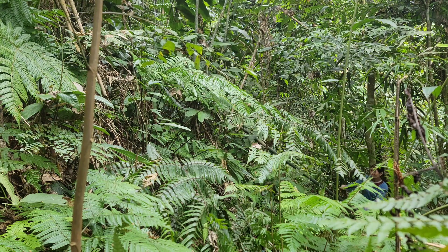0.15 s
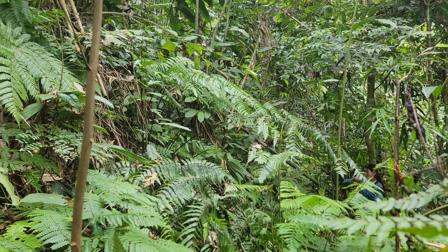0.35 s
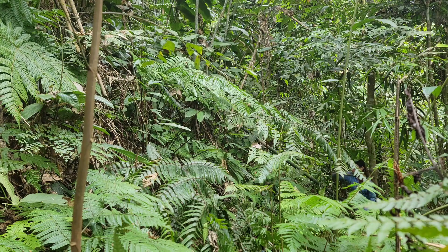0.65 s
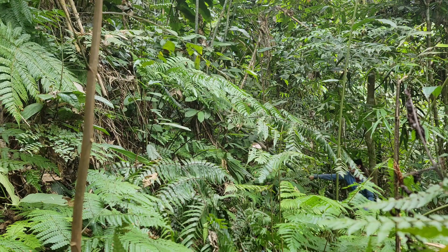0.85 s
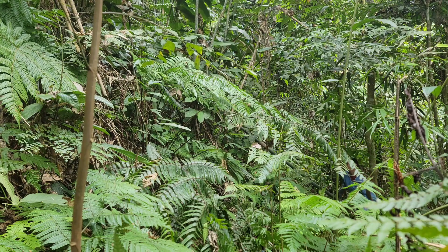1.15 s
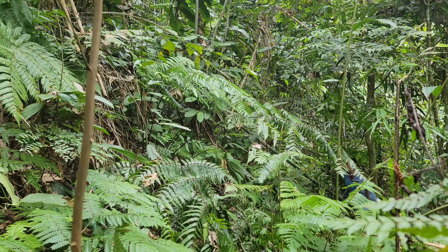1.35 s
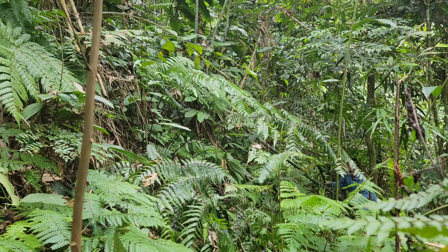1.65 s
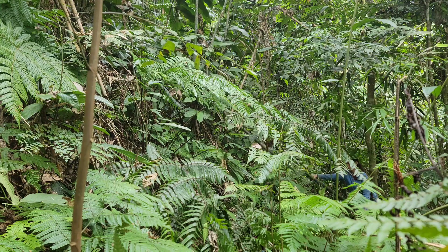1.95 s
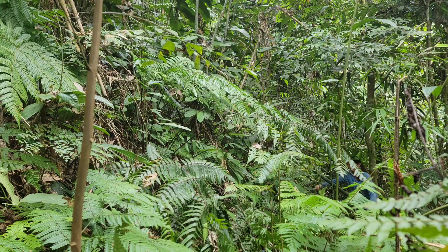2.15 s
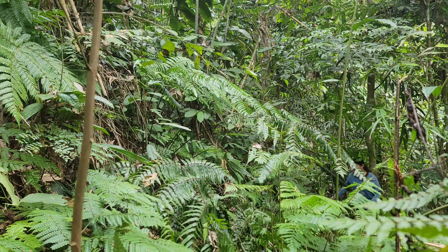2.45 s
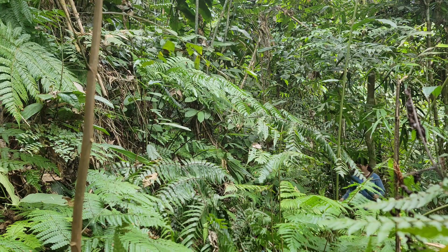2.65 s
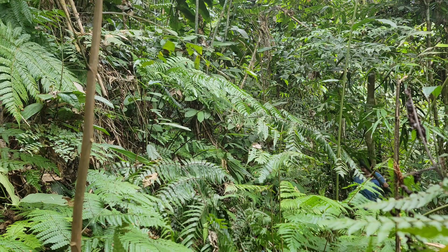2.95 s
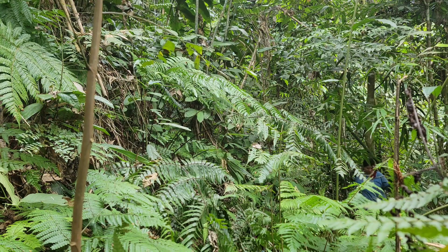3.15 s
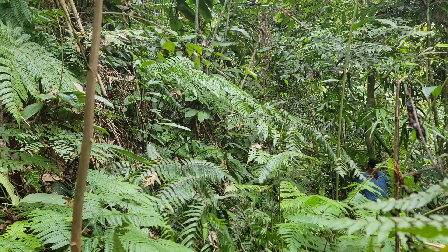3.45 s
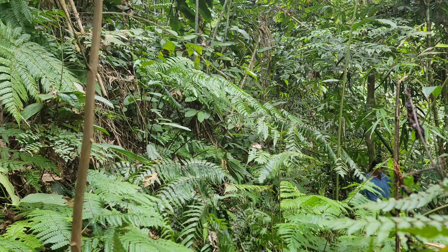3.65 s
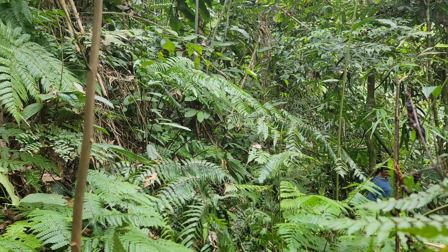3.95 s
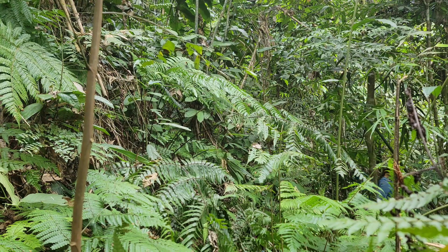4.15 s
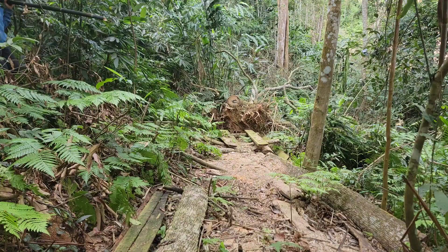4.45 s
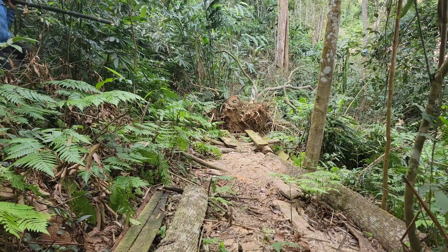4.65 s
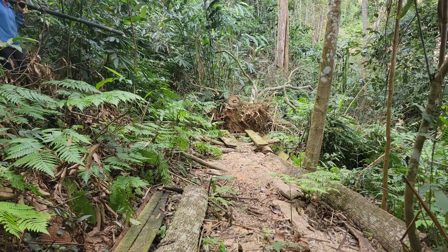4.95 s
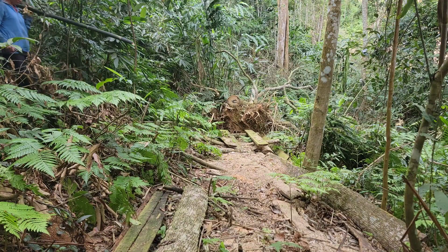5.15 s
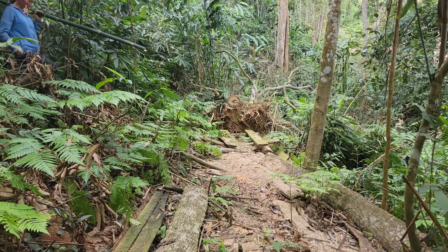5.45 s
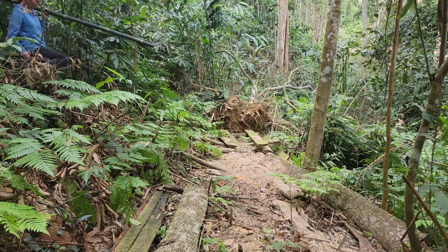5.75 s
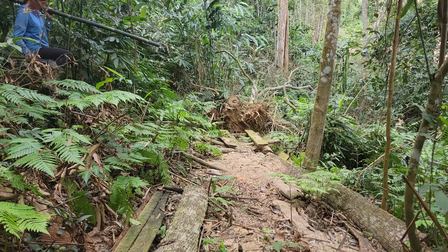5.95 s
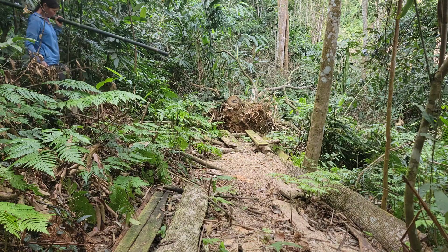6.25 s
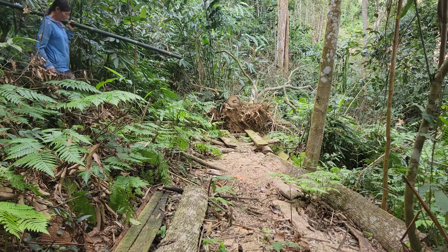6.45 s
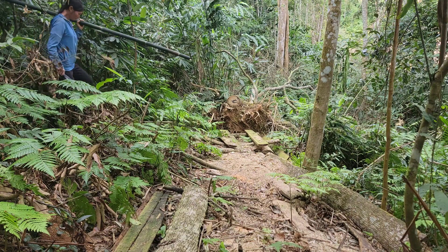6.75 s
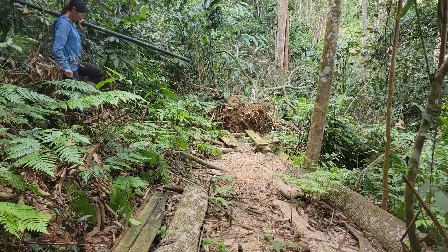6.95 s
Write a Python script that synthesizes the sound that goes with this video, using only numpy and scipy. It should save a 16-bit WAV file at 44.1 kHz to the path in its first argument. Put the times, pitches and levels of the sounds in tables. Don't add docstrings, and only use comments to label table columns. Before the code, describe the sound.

Quiet outdoor stereo with faint forest air. A hidden walker on the right rustles fern fronds, cracks twigs and gives a long hollow pole two loud knocks, the first with a quick rebound, while distant dull wood knocks echo. A tiny gap of silence marks a change of place; then, left of a path, dry leaves crunch in uneven surges and brittle stalks snap, drier and crisper than before.

```python
import sys
import numpy as np
from scipy import signal
from scipy.fft import rfft, irfft
from scipy.io import wavfile
from scipy.ndimage import uniform_filter1d, map_coordinates

SR = 44100
rng = np.random.default_rng(int(sys.argv[2]) if len(sys.argv) > 2 else 0)


def magnitude_from_level(level_db):
    exponent = np.asarray(level_db, float) / 20
    return 10 ** exponent


def to_wav(s):
    ch = np.atleast_2d(s).T
    pcm = np.round(np.clip(ch, -1, 1) * 32767)
    wavfile.write(sys.argv[1], SR, pcm.astype(np.int16))


N = 313110
TIME = np.arange(N) / SR

# (time [s], level [dB])
SCENE_CHANGE = [(0, -1), (4.335, -1), (4.365, -15), (4.38, -41), (4.385, -89.5), (4.445, -77), (4.452, -33),
                (4.465, -5), (4.49, 1)]
PATH_START_S = SCENE_CHANGE[4][0]


def evened(x):
    return x / np.sqrt(np.mean(x ** 2) + 1e-20)


def read(points, hz):
    f, value = np.transpose(points)
    return np.interp(np.log(hz + 1), np.log(f + 1), value)


def add(mix, s, sound):
    part = mix[round(s * SR):][:len(sound)]
    part += sound[:len(part)]


def shape(x, gain):
    return irfft(rfft(x) * gain(np.fft.rfftfreq(x.shape[-1], 1 / SR)), x.shape[-1])


def band(hz, lo_hz, hi_hz):
    return 1 / np.sqrt((1 + (lo_hz / (hz + 1)) ** 6) * (1 + (hz / hi_hz) ** 6))


def ring(modes, length_s, tilt_db=0):
    t = np.arange(round(length_s * SR)) / SR
    out = np.zeros(len(t))
    for hz, db, t60 in modes:
        level_db = db + tilt_db * np.log2(hz / 400) - 60 * t / t60
        out += magnitude_from_level(level_db) * np.sin(2 * np.pi * hz * t)
    return out


def diffuse(pair, alike_hz=750):
    def alike(hz):
        return 1 / (1 + (hz / alike_hz) ** 2)

    def unrelated(hz):
        return np.sqrt(1 - alike(hz) ** 2)

    return np.array([pair[0], shape(pair[0], alike) + shape(pair[1], unrelated)])


def echoes(t60s, start_s):
    hz, t, z = signal.stft(diffuse(rng.standard_normal((2, SR))), SR, nperseg=256)
    decay = magnitude_from_level(-60 * t / read(t60s, hz)[:, None])
    out = signal.istft(z * decay, SR, nperseg=256)[1][:, :SR]
    out = out * np.clip(TIME[:SR] / start_s, 0, 1)
    return out / np.linalg.norm(out[0])


def tail(x, t60s, start_s=0.0027):
    return signal.fftconvolve(x[None], echoes(t60s, start_s), axes=1)[:, :N]


def placed(direct, scattered, sideways=1):
    # (time [s], lag of the left microphone [ms], left minus right [dB])
    place = [
        (0, 0.22, -4),
        (3.3, 0.23, -4.5),
        (4.399, 0.25, -7.5),
        (4.41, -0.25, -1.5),
        (7.1, -0.18, -.7),
    ]
    sway, waver_hz = 0.073, 1.6
    s, lag_ms, pan_db = np.transpose(place)
    swing = 1 + sway * np.sin(2 * np.pi * waver_hz * TIME)
    lag_s = sideways * np.interp(TIME, s, lag_ms) * swing / 1000
    pan = magnitude_from_level(sideways * np.interp(TIME, s, pan_db) * np.array([[.5], [-.5]]))
    left, right = direct + scattered
    return pan * np.array([map_coordinates(left, [np.arange(N) - lag_s * SR], order=3), right])


def hush():
    # (frequency [Hz], level [dB per Hz])
    air_colour = [(12, -40), (20, -17), (43, -0.5), (222, -9), (399, 0), (1030, -5.5), (1260, -5),
                  (1860, -12.5), (2910, -8.5), (8650, -4), (11100, -11.5), (14700, -4.5), (16000, -28.5)]
    level_db = -69.5
    air = shape(diffuse(rng.standard_normal((2, N))), lambda hz: magnitude_from_level(read(air_colour, hz)))
    drift = evened(uniform_filter1d(uniform_filter1d(rng.standard_normal(N), 4000), 4000))
    return magnitude_from_level(level_db + 0.31 * drift + np.array([[-.7], [.7]])) * evened(air)


def far_knocks():
    # (time [s], peak [dB])
    knocks = [(0.226, -54.5), (1.367, -49.5), (1.516, -59.5), (2.294, -51), (2.891, -58.5), (3.162, -47.5),
              (4.077, -53)]
    # (frequency [Hz], level [dB], decay t60 [s])
    wood = [(198.7, -5.5, 0.09), (420, 1, .12), (473.6, 1.5, 0.09), (842, 5, 0.04), (1140, -4.5, 0.035)]
    # (frequency [Hz], decay t60 [s])
    valley = [(150, 0.19), (430, 1.4), (1000, 0.79)]
    late_cycles = 3.15
    length_s = .3
    soft_start = np.clip(TIME[:round(length_s * SR)] / 0.0037, 0, 1)
    out = np.zeros(N)
    for s, db in knocks:
        for mode in wood:
            arrival_s = s - .009 + late_cycles / mode[0]
            add(out, arrival_s, magnitude_from_level(db - 1.5) * ring([mode], length_s) * soft_start)
    return out * magnitude_from_level([[-1.5], [1.5]]) + magnitude_from_level(-3.0) * tail(out, valley, start_s=0.014)


def pole():
    # (time [s], crack [dB], crack t60 [s], air column [dB], brightness [dB per octave])
    blows = [
        (0.8425, -27, 0.18, -26, -1),
        (0.8554, -29, 0.16, -30.5, 4.5),
        (0.869, -41.5, 0.046, -43.5, -5.5),
        (1.9961, -25.5, 0.14, -26, 1.5),
    ]
    # (frequency
    # [Hz], level [dB], decay t60 [s])
    column_modes = [(98, -9, 0.11), (127, -8.5, 0.82), (381.7, -7.5, 0.31), (642, 3, 0.08), (901, 4, 0.07),
                    (1086, -10, 0.09), (1154, -10, 0.14), (1475, -5, 0.05), (1610, -15.5, 0.02),
                    (2144, -11, 0.049)]
    # (frequency [Hz], level [dB per Hz])
    crack_colour = [(120, -42.5), (200, -30.5), (482, -14.5), (612, -12), (899, -9.5), (1320, -5.5),
                    (7680, -12), (14900, -22.5), (16000, -39.5)]
    # (frequency [Hz], decay t60 [s])
    forest = [(100, 0.66), (400, 0.93), (1200, 0.44), (3000, 0.62), (8000, 0.49), (15000, 0.73)]
    crack, column, t = np.zeros((3, N)), np.zeros(N), TIME[:SR]
    stilled = np.interp(t, [0, .004, .4, .56], [0, 1, 1, 0])
    for s, crack_db, t60, column_db, tilt_db in blows:
        near = rng.standard_normal((3, SR)) * magnitude_from_level(-60 * t / t60 + np.array([[-3.], [0], [0]]))
        direct = near[0] * (1 + 0.5 * magnitude_from_level(-60 * t / 0.0067))
        scattered = diffuse(near[1:]) + magnitude_from_level(22.0) * echoes(forest, 0.0018)
        burst = np.array([direct, *scattered]) * np.clip(t / 0.00037, 0, 1)
        burst = shape(burst, lambda hz: magnitude_from_level(read(crack_colour, hz) + 18.0)) * (t < .95)
        for channel, part in zip(crack, burst):
            add(channel, s, magnitude_from_level(crack_db) * part)
        add(column, s, magnitude_from_level(column_db) * ring(column_modes, 1., tilt_db) * stilled)
    column_tail = magnitude_from_level(-5.0) * tail(column, [(hz, 0.29 * t60) for hz, t60 in forest])
    return placed(crack[0], crack[1:], sideways=0.41) + placed(column, column_tail, sideways=0.51)


def snaps():
    # (time [s], peak [dB], ringing [Hz], below 1.5 kHz [dB], fizz above 7 kHz [dB])
    twigs = [(0.3313, -35, 1140, -6, -44), (0.358, -47, 1130, -6, -13), (0.5803, -54.5, 3160, -15, -9),
             (0.6909, -45.5, 1890, -4.5, -19), (0.7495, -43, 3850, -33, -30), (0.7859, -61, 1220, -1, -18),
             (1.1981, -46.5, 2630, -15, -9), (1.312, -55, 842, 0.5, -2), (1.823, -68, 1250, -13, 10),
             (2.6177, -49.5, 840, 1, -24), (2.7044, -45, 3960, -8, -21), (2.814, -38, 1350, -10, -13),
             (2.8761, -56, 3000, 10, 10), (3.0372, -48, 540, 10, -26), (3.185, -43.5, 3120, 5, -3),
             (3.5227, -46, 1350, 3.5, -24), (3.826, -47.5, 3300, 2.5, -22), (3.8577, -45, 3330, -3, -12),
             (3.9312, -50, 1300, -6, -24), (4.326, -56, 1140, -2.5, -34.5)]
    # (time [s], peak [dB], ringing [Hz], below 1.5 kHz [dB], fizz above 7 kHz [dB])
    stalks = [(4.5442, -57, 2980, 5, -16), (4.7546, -64.5, 764, 9.5, -9), (4.781, -66.5, 3320, -2, 13),
              (4.8162, -45, 3100, -9, -8), (4.9282, -37, 4150, -17, -4), (5.1187, -31, 3250, -14, -5.5),
              (5.2145, -34.5, 4270, -21, -9.5), (5.272, -32.5, 3380, -4, 10),
              (5.3083, -43, 4170, -11, -21.5), (5.5479, -32.5, 3420, -27, -2), (5.6305, -33.5, 4080, -9, 1),
              (5.663, -33, 4050, -22, -10), (5.7048, -27, 3970, -13, -10), (6.006, -52, 3450, -29, -21.5),
              (6.135, -44, 4660, -20, -4), (6.327, -39, 4300, -22, 4), (6.6313, -32.5, 4200, -21, -11),
              (6.6523, -31.5, 4200, -36, -14), (6.9201, -43.5, 3930, -12, -19), (7.002, -39, 4040, -8, -8),
              (7.047, -39, 1330, -7, -23)]
    twig_t60_s, stalk_t60_s = 0.058, 0.023
    tick, tick_t60_s = 0.64, 0.0049
    lead = 88
    out, t = np.zeros((3, N)), TIME[:8000]
    for s, db, ring_hz, low_db, fizz_db in [*twigs, *stalks]:
        t60 = stalk_t60_s if s > PATH_START_S else twig_t60_s
        direct = magnitude_from_level(-60 * t / (0.54 * t60)) + tick * magnitude_from_level(-60 * t / tick_t60_s)
        echo = magnitude_from_level(-3.0 - 60 * t / (2.53 * t60)) * np.clip(t / 0.0053, 0, 1)
        burst = rng.standard_normal((3, len(t))) * np.array([direct, echo, echo])

        def colour(hz):
            body = band(hz, 1500, 5800)
            low = 1.78 * magnitude_from_level(low_db) * band(hz, 430, 1700)
            fizz = 1.86 * magnitude_from_level(fizz_db) * band(hz, 7000, 16000)
            resonance = 1 + 2.8 / (1 + ((hz - ring_hz) / (0.049 * ring_hz)) ** 2)
            return (body + low + fizz) * resonance

        burst = np.roll(shape(burst, colour), lead, axis=1) * (t < .16)
        for channel, part in zip(out, burst):
            add(channel, s - lead / SR, magnitude_from_level(db - 1.0) * part)
    return placed(out[0], diffuse(out[1:], alike_hz=1610))


def crackle(per_s, spread_db, clump_db, hiss):
    size = magnitude_from_level(spread_db * np.minimum(rng.exponential(1, N), 3.5)) * rng.standard_normal(N)
    breaks = evened(size * (rng.random(N) < per_s / SR))
    clumps = evened(uniform_filter1d(uniform_filter1d(rng.standard_normal(N), 300), 300))
    return magnitude_from_level(clump_db * clumps) * (breaks + hiss * rng.standard_normal(N))


def pushes(rows, layer_db, share):
    roundness = 1.3
    s, db, swell, fade, weight_db = np.transpose(rows)[:, :, None]
    t = TIME[::32]
    away = np.where(t < s, (s - t) / swell, (t - s) / fade)
    power = magnitude_from_level(db + layer_db + share * weight_db - 20 * away ** roundness) ** 2
    return np.interp(TIME, t, np.sqrt(power.sum(0)))


def rustle():
    # (strongest push [s], leaves [dB], swell [s], fade [s], weight on stems and soil [dB])
    brushes = [(0, -64.5, .01, 0.17, -7), (.332, -53, 0.0076, 0.051, 3), (.45, -66, 0.9, 0.18, 5.5),
               (.746, -70, 0.023, .08, -6), (.81, -69.5, 0.075, 0.28, 17), (1.1, -62, 0.86, 0.53, 3),
               (1.37, -65.5, 0.068, 0.077, 5), (1.62, -75.5, 0.54, 0.62, 10.5),
               (1.98, -65, 0.035, 0.11, -2), (2.15, -50, 0.18, 0.24, 0), (2.31, -72, 0.014, .2, -4),
               (2.55, -60, 0.77, 1, 2), (2.9, -53.5, 0.54, 0.28, -3.5), (3.05, -55, 0.46, 0.38, -13),
               (3.17, -51, 0.28, 0.22, -2), (3.22, -62, 0.12, 0.23, 13), (3.45, -61.5, 0.36, 0.49, -5.5),
               (3.525, -59, .008, 0.042, -5), (3.63, -64, 0.026, 0.12, -7), (3.84, -63.5, 0.03, 0.19, -6),
               (3.93, -70.5, .05, 0.11, 2), (4.09, -67.5, 0.061, 0.4, 2), (4.33, -78, .03, .1, 6.5)]
    # (strongest push [s], leaves [dB], swell [s], fade [s], weight on stems and soil [dB])
    steps = [(4.548, -65.5, 0.013, 0.093, 3), (4.87, -56, 0.088, 0.13, 12), (5.01, -45.5, .2, 0.57, 1),
             (5.135, -43, 0.053, 0.13, 1.5), (5.225, -42.5, 0.053, 0.075, -2),
             (5.273, -37.5, 0.016, 0.099, -3), (5.36, -54.5, 0.073, 0.067, 0), (5.495, -48, 0.06, .2, -5.5),
             (5.6, -45, 0.31, 0.22, 1.5), (5.71, -45, 0.14, .2, 0.5), (5.81, -49.5, 0.24, 0.22, 1.5),
             (5.92, -60.5, 0.15, 0.13, -3), (6.04, -64.5, .15, 0.54, -1.5), (6.142, -52, 0.017, 0.16, -2.5),
             (6.245, -46.5, .08, 0.11, 1.5), (6.345, -41, 0.13, 0.22, 4.5), (6.45, -53, 0.16, 0.1, -10),
             (6.55, -53, .15, .25, 0), (6.665, -47, 0.17, 0.18, 0), (6.785, -47, 0.29, 0.13, 1.5),
             (6.94, -57, 0.17, 0.39, 2), (7.085, -49.5, 0.17, .2, 2.5)]
    # (frequency [Hz], level [dB per Hz])
    frond_colour = [(24, -64), (40, -30), (130, -12.5), (220, -25), (354, -14), (529, -7), (663, -15.5),
                    (1150, 1.5), (1720, -6), (2980, -1), (5870, -7), (8770, -8), (14800, -12.5),
                    (16000, -8)]
    # (frequency [Hz], level [dB per Hz])
    litter_colour = [(24, -54), (40, -22), (171, -10.5), (283, -13), (372, -4.5), (467, -16), (751, -11.5),
                     (1180, -0.5), (2260, -5.5), (3140, 0), (4240, -2), (6820, -5.5), (14500, -7),
                     (16000, -5.5)]
    # (low edge [Hz], high edge [Hz])
    layer_edges = [2500, 7000], [7000, 16500], [600, 2500], [70, 600]
    frond_layers = [0, -0.5, -4, -11]
    litter_layers = [-1.5, 0.5, -11.5, -19.5]
    weight_shares = [0.12, -0.55, 0.81, 0.9]
    near = crackle(per_s=5000, spread_db=3.0, clump_db=3.0, hiss=0.89)
    far = np.array([crackle(per_s=9000, spread_db=2.5, clump_db=1.24, hiss=.8) for side in "LR"])
    on_path, hz = TIME > PATH_START_S, np.fft.rfftfreq(N, 1 / SR)
    thicket = brushes, frond_colour, frond_layers, 800, ~on_path
    path = steps, litter_colour, litter_layers, 1740, on_path
    out = np.zeros((3, N))
    for rows, colour, layers_db, alike_hz, here in (thicket, path):
        drive = rfft(np.array([near, *diffuse(far, alike_hz)])) * magnitude_from_level(read(colour, hz))
        for (lo_hz, hi_hz), layer_db, share in zip(layer_edges, layers_db, weight_shares):
            layer = evened(irfft(drive * band(hz, lo_hz, hi_hz), N))
            out += here * pushes(rows, layer_db, share) * layer
    direct_share = np.where(on_path, .25, .04)
    direct, scattered = np.sqrt(direct_share) * out[0], np.sqrt(1 - direct_share) * out[1:]
    return placed(direct, scattered, sideways=np.where(on_path, 1, .6))


def scene():
    return hush() + far_knocks() + pole() + snaps() + rustle()


def top_cut(x):
    return signal.sosfilt(signal.butter(12, 16640, fs=SR, output="sos"), x)


def record(dry):
    limited = shape(dry, lambda hz: np.interp(hz, [15600, 15900, 16600], [1, .08, .01]))
    mix = limited * magnitude_from_level(np.interp(TIME, *np.transpose(SCENE_CHANGE)))
    return top_cut(mix)


dry = scene()
out = record(dry)
to_wav(out)
```